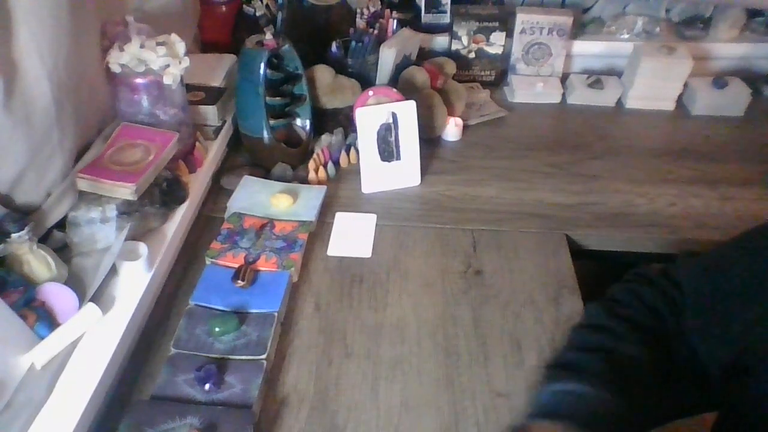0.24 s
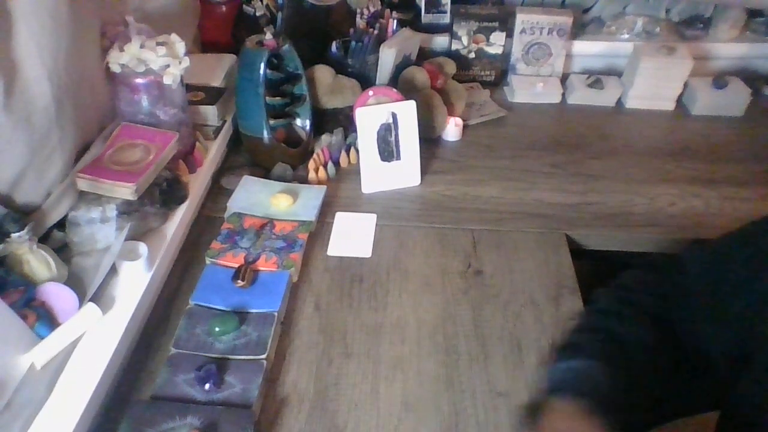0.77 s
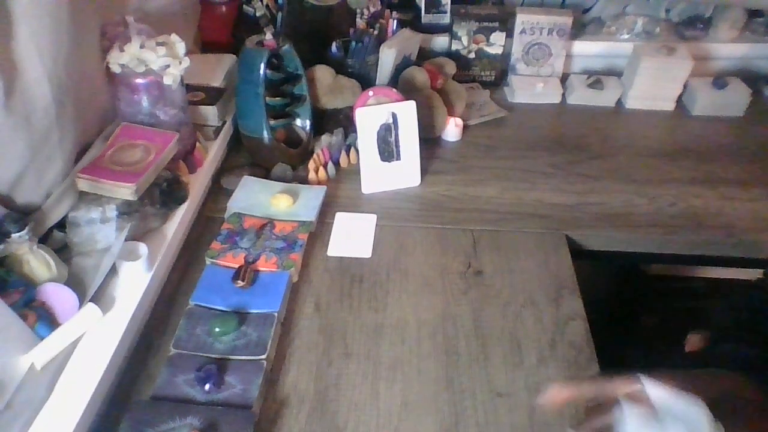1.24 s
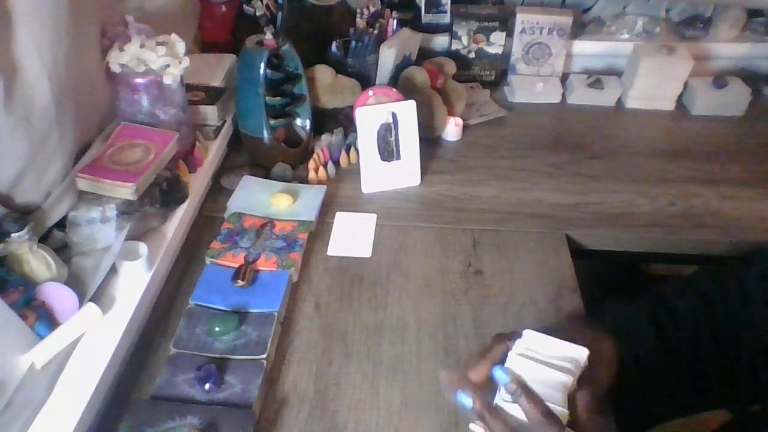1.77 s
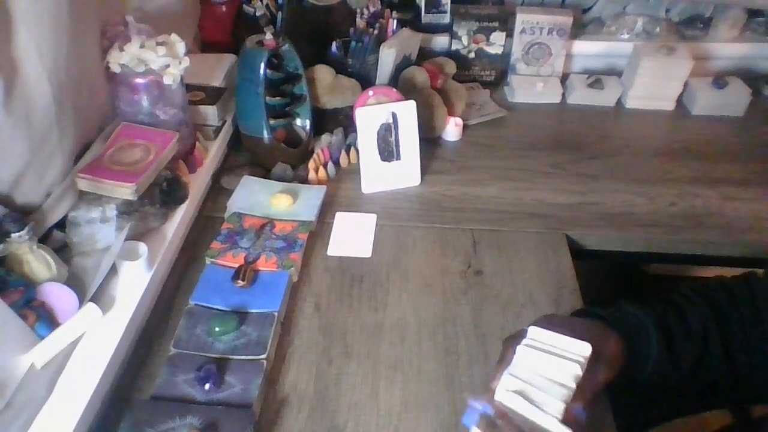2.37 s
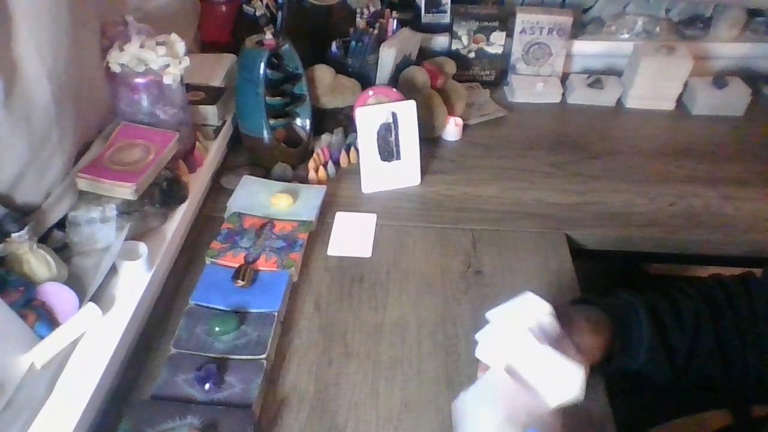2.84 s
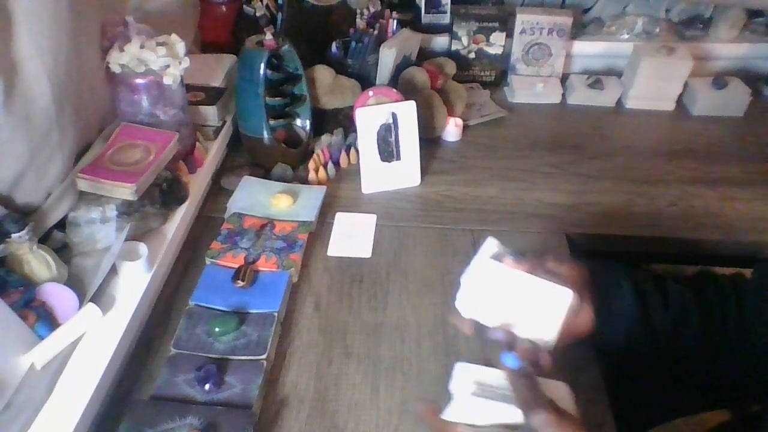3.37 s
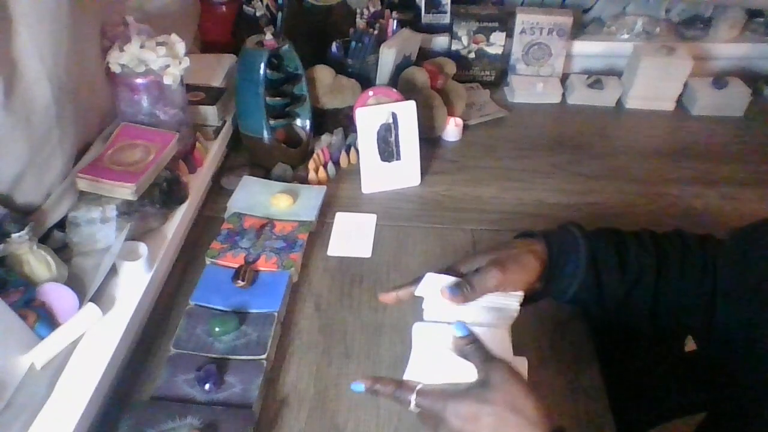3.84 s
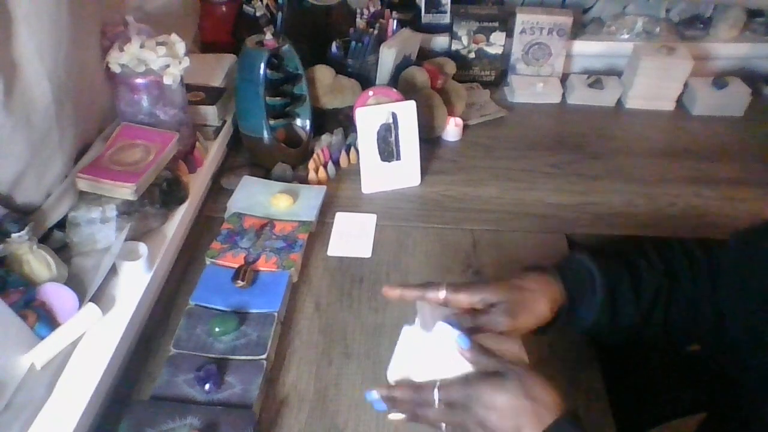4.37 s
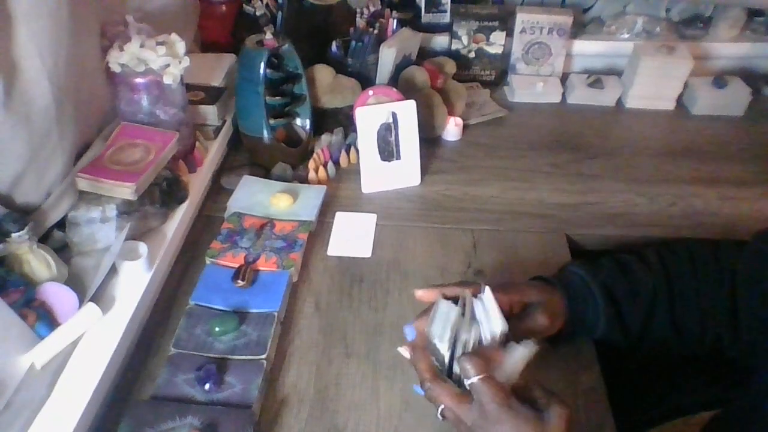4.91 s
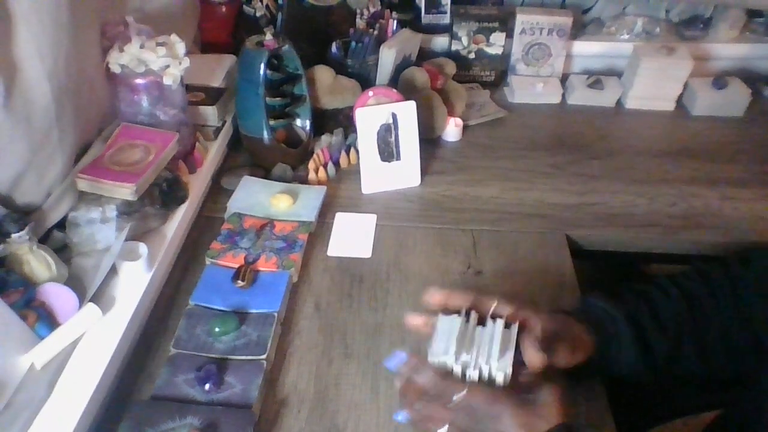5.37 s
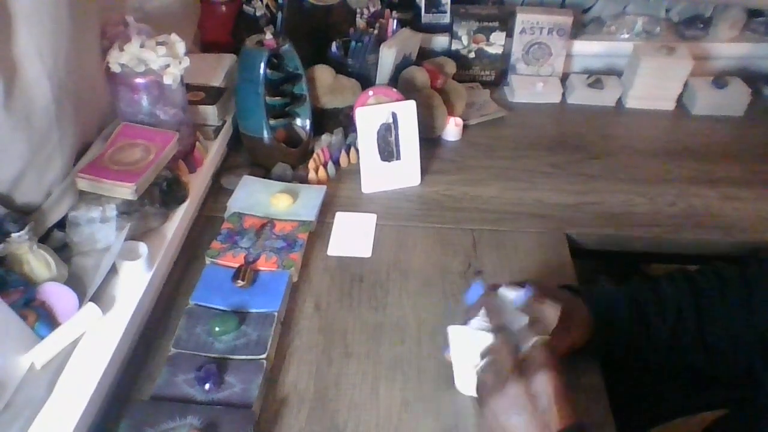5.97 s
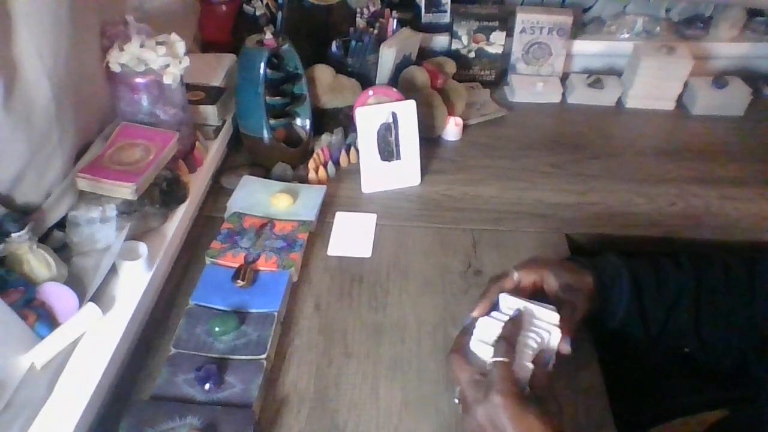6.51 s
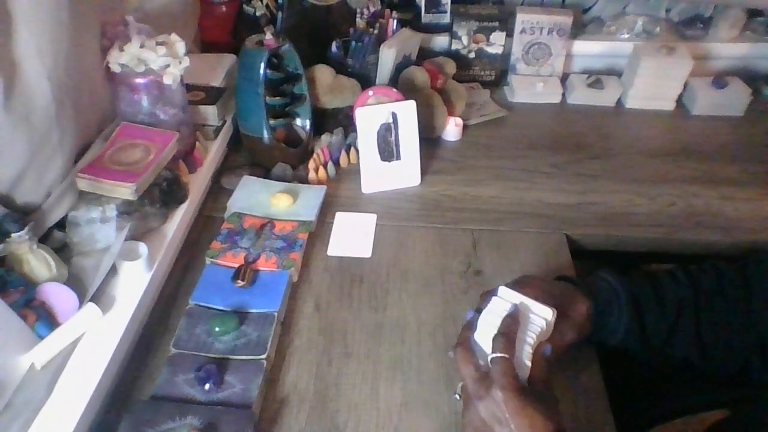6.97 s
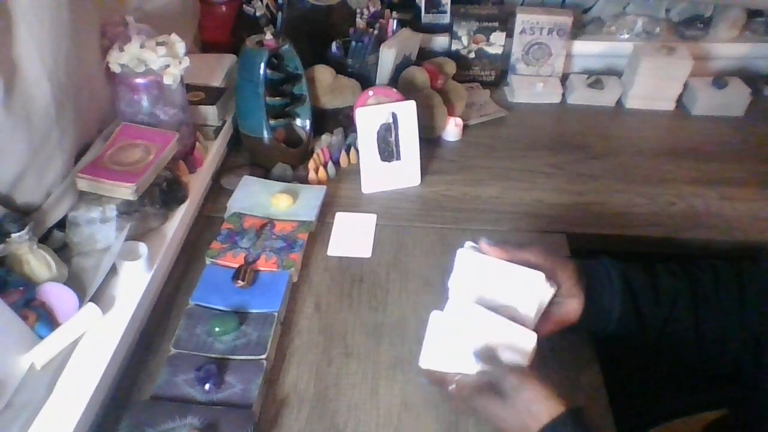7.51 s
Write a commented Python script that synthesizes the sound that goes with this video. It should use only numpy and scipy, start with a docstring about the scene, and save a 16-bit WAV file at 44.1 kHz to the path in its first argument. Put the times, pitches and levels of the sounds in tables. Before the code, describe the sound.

Near silence, then a hard double clack of cards, papery riffling and rubbing, firm taps on wood and short pauses in a small room.

```python
"""A deck of stiff cards is split, pushed together and knocked square on a wooden desk in a small room.
Knocks are impulses and noise rattles through resonant bodies; slides are stick-slip clicks over rubbing noise.
Brief wavering tones, rustles of ticks and rubbing, a faint thin hiss and slow pulses of the shoved desk join in.
A nearby computer microphone limits the loudest peaks and turns down the quiet with its noise suppressor."""
import sys
import numpy as np
from scipy import signal
from scipy.io import wavfile
from scipy.ndimage import uniform_filter1d

SR = 44100
rng = np.random.default_rng(int(sys.argv[2]) if len(sys.argv) > 2 else 0)


def pcm_store(signal):
    """Save signal as 16-bit PCM."""
    levels = np.round(np.clip(np.atleast_2d(signal), -1, 1) * 32767)
    wavfile.write(sys.argv[1], SR, levels.astype(np.int16).T)


N = 341334  # length in samples


def from_db(db):
    """Logarithmic level: decibels become amplitude gain."""
    return 10 ** (np.asarray(db) / 20)


def unit_rms(x):
    """Normalisation: the signal is scaled to a root mean square of 1."""
    return x / np.sqrt(np.mean(x ** 2) + 1e-20)


def read(points, hz):
    """Interpolation: a table of frequency and value is read on a log-frequency axis."""
    table_hz, value = np.transpose(points)
    return np.interp(np.log(hz + 1), np.log(table_hz + 1), value)


def add(mix, start_s, sound):
    """Superposition: a sound is summed into the mix from its start time."""
    part = mix[max(round(start_s * SR), 0):][:len(sound)]
    part += sound[:len(part)]


# registers of the sound, in order desk, packet, card edges, card faces: low_hz, high_hz
REGISTER_BANDS = [(90, 450), (450, 1200), (1200, 3000), (3000, 9000)]


def responses(colour, modes, size=8192):
    """Resonance: minimum-phase impulse responses of a body, one for each register."""
    hz = np.fft.rfftfreq(size, 1 / SR) + 1
    body_db = read(colour, hz)
    for mode_hz, width_hz, mode_db in modes:
        body_db = body_db + mode_db / (1 + (2 * (hz - mode_hz) / width_hz) ** 2)
    bodies = []
    for k, (low_hz, high_hz) in enumerate(REGISTER_BANDS):
        # the lowest register has no lower limit
        share = 1 / (1 + (hz / high_hz) ** 10) / (1 + (k > 0) * (low_hz / hz) ** 10)
        log_gain = np.log(from_db(body_db) * np.sqrt(share) + 1e-5)
        # the Hilbert transform of the log gain gives the phase of a causal body
        circle = np.r_[log_gain, log_gain[-2:0:-1]]
        spectrum = np.exp(np.conj(signal.hilbert(circle)))
        bodies.append(np.fft.ifft(spectrum).real[:size // 2])
    return bodies


ATTACK_S, RELEASE_T60_S = 0.0076, 0.11


def stroke(length_s, swell_db):
    """Amplitude envelope: linear attack, a swell or fade even in decibels, exponential release."""
    t = np.arange(0, length_s + 2 * RELEASE_T60_S, 1 / SR)
    attack = np.minimum(t / ATTACK_S, 1)
    hold_db = swell_db * (np.minimum(t / length_s, 1) - .5)
    release_db = -60 * np.maximum(t - length_s, 0) / RELEASE_T60_S
    return attack * from_db(hold_db + release_db)


DECK_IN_HAND_S = 1.7  # the deck is lifted; before this no loose edges flick


def flicks(per_s=58, spread_db=5.5, count=1500):
    """Random point process: card edges escape one by one as single clicks at uneven gaps."""
    gap_draw, size_draw = rng.random((count, 2)).T
    gaps_s = (.1 - .9 * np.log(1 - gap_draw)) / per_s
    at = (np.cumsum(gaps_s) * SR).astype(int)
    sizes = from_db(spread_db * (2 * size_draw - 1))
    train = np.zeros(N)
    train[at[at < N]] = sizes[at < N]
    return unit_rms(train) * (np.arange(N) > DECK_IN_HAND_S * SR)


# a hand pushes a packet over cards or desk; weight (desk register) and hiss (face register) are relative
# to the level: start_s, length_s, level_db, swell_db, weight_db, hiss_db
PACKET_SLIDES = [(0.0, 0.11, -50, -3, -3, -27), (0.205, 0.11, -63.5, -1.5, 10, 14),
                 (0.364, 0.066, -68.5, -15.5, -10.5, 22), (0.479, 0.14, -42.5, -6.5, -3.5, -8.5),
                 (0.602, 0.16, -50, 9, -34, -3.5), (0.763, 0.16, -47.5, 4, 6, 7.5),
                 (0.93, 0.13, -54.5, 4.5, 4.5, 8.5), (1.093, 0.085, -56.5, 8, -21, 6.5),
                 (1.483, 0.04, -76, 6.5, -8, 28), (2.409, 0.079, -45.5, -0.5, -2.5, -21),
                 (2.492, 0.052, -34.5, -19, -2.5, -18.5), (2.707, 0.21, -44, 10.5, 8.5, -14.5),
                 (2.865, 0.043, -32.5, 6, 6, -12), (2.932, 0.054, -30.5, 7, -12, -9),
                 (3.017, 0.033, -42, 19, -26.5, -19), (3.223, 0.04, -66.5, 1, -20, 16.5),
                 (3.703, 0.088, -41, -19.5, 2, -12), (3.775, 0.1, -31, 7.5, -9, -6.5),
                 (3.892, 0.079, -35.5, 9, -3.5, -9), (4.008, 0.14, -42, 3.5, -9.5, 1),
                 (4.184, 0.12, -45, 14.5, -6.5, 5), (4.264, 0.095, -31.5, -6, -8.5, -14),
                 (4.392, 0.069, -42, 4, -14, 1.5), (4.517, 0.054, -30.5, 5.5, -10.5, -9.5),
                 (4.584, 0.083, -52, 4.5, -16, 6), (4.659, 0.17, -32.5, 21, -2.5, -37.5),
                 (4.911, 0.089, -45, 18.5, 2, -15), (5.025, 0.11, -48.5, 1, -11, -34.5),
                 (5.137, 0.069, -33.5, 17, -3, -7), (5.199, 0.18, -29.5, 0.5, 0, -13),
                 (5.492, 0.037, -42.5, 18, -16.5, -29.5), (5.541, 0.13, -27.5, 0, -9, -19),
                 (5.682, 0.12, -29.0, -9, -0.5, -17.5), (5.811, 0.15, -28.0, -9, -5, -16),
                 (5.922, 0.067, -27.0, -5.5, -10.5, -8.5), (6.001, 0.12, -53, 8.5, -32, 4),
                 (6.143, 0.099, -57.5, -2, -22.5, 22.5), (6.279, 0.085, -37.5, -10, 6, -18),
                 (6.401, 0.177, -56.5, 19, 9, -14), (6.934, 0.032, -43, 4, 7, -19),
                 (7.207, 0.066, -31.5, 7.5, -5, -9.5), (7.402, 0.06, -30.5, -5.5, -12, -19),
                 (7.477, 0.032, -27, 2.5, -19, -15)]
EDGE_RUB_DB, EDGE_HISS_SHARE = -1.5, .48  # edges rub along and take this share of the hiss decibels


def pressure():
    """Power summation: overlapping strokes give the rubbing strength, samples x registers."""
    power = np.zeros((N, len(REGISTER_BANDS)))
    for start_s, length_s, level_db, swell_db, weight_db, hiss_db in PACKET_SLIDES:
        edge_db = EDGE_RUB_DB + EDGE_HISS_SHARE * hiss_db
        register_db = level_db + np.array([weight_db, 0, edge_db, hiss_db])
        add(power, start_s, np.outer(stroke(length_s, swell_db), from_db(register_db)) ** 2)
    return np.sqrt(power)


def shifting(x, patchy_db):
    """Time-varying spectrum: hands and packets move, so the colour of the rubbing drifts."""
    z = signal.stft(x, SR, nperseg=512, noverlap=384)[2]
    across_bins = uniform_filter1d(rng.standard_normal(z.shape), size=6, axis=0)
    patches = unit_rms(uniform_filter1d(across_bins, size=20, axis=1))  # over frames
    return signal.istft(z * from_db(patchy_db * patches), SR, nperseg=512, noverlap=384)[1][:N]


# friction in each register; smooth rubbing and flicks are relative to the slips, spread is per unit of
# random force, patchy is the drift of colour: slips_per_s, spread_db, smooth_db, flick_db, patchy_db
REGISTER_FRICTION = [(500, 0.99, -7, -19, 6.5), (532, 0.6, -3.5, -7, 8.1), (533, 1.5, -3, -13, 6.9),
                     (975, 1.4, 2.5, -1.5, 4.5)]
# resonances of the packet in cupped hands, above the broad colour: pitch_hz, width_hz, level_db
PACKET_MODES = [(160, 150, 9.5), (311.6, 30, 10.5), (464.7, 41, 10.5), (684.7, 21, 13), (824.5, 32, 10),
                (996, 17, 11), (1488, 70, 11), (1853, 120, 6.5), (2306, 53, 7), (3700, 90, -5.5)]
# broad colour of sliding: frequency_hz, level_db
SLIDING_COLOUR = [(30, -32), (55, -28), (80, -24.5), (140, 12.5), (400, 5.5), (750, 15.5), (1300, 1.5),
                  (2500, -15.5), (4000, -19), (5500, -18), (7200, -19.5), (9000, -40)]


def slides(grip_db=0.5, trim_db=.3, steady_s=.035):
    """Stick-slip friction: tiny clicks and flicks over smooth rubbing, as the grip varies."""
    out, edges = np.zeros(N), flicks()
    wander = uniform_filter1d(uniform_filter1d(rng.standard_normal(N), size=260), size=260)
    grip = from_db(grip_db * unit_rms(wander))
    chance, sign = rng.random(N), rng.choice([-1, 1], N)
    force = np.minimum(rng.exponential(1, N), 4)
    bodies = responses(SLIDING_COLOUR, PACKET_MODES)
    for body, strength, friction in zip(bodies, pressure().T, REGISTER_FRICTION):
        slips_per_s, spread_db, smooth_db, flick_db, patchy_db = friction
        slips = unit_rms((chance < slips_per_s / SR) * sign * from_db(spread_db * force))
        smooth = from_db(smooth_db) * rng.standard_normal(N)
        drive = (slips + smooth + from_db(flick_db) * edges) * grip
        rub = shifting(signal.oaconvolve(drive, body)[:N], patchy_db)
        # the stroke sets the mean strength; only the fine grain is left to chance
        mean_power = uniform_filter1d(rub ** 2, int(steady_s * SR))
        rub /= np.sqrt(abs(mean_power) + 1e-12)
        out += rub * strength * from_db(trim_db)
    return out


# a packet strikes cards or desk; thump, clack of edges and snap of faces are relative to the knock,
# t60 is before the stretch of each register: start_s, knock_db, thump_db, clack_db, snap_db, rattle_t60_s
PACKET_KNOCKS = [(0.2188, -49, 3.5, 3.5, 9.5, 0.04), (0.493, -30.5, -1.5, -12, -20, 0.034),
                 (0.505, -49.5, 12.5, 9, 18, 0.03), (1.451, -58, -3, 6.5, 25.5, 0.031),
                 (1.775, -12, -6.5, -8.5, -16.5, 0.029), (1.7841, -9, -11, -4, -13.5, 0.079),
                 (1.8033, -20.5, -11.5, -2.5, -1.5, 0.12), (1.8236, -25, -5, 7, -7.5, 0.12),
                 (1.8326, -41.5, 4, -13, -2, 0.025), (1.9849, -29, -12, 5, -16, 0.097),
                 (2.0409, -28.5, -11.5, 5, -1.5, 0.096), (2.0613, -33, -10, 6, -0.5, 0.073),
                 (2.134, -30.5, -14.5, -13, -28, 0.12), (2.1556, -34.5, -15, 10, -9, 0.065),
                 (2.1791, -31.5, -22.0, -4, -16.5, 0.083), (2.4846, -27.5, -8.5, 0.5, -19, 0.063),
                 (2.5178, -30, -1, -1.5, -17, 0.067), (2.9023, -36.5, -12, 4, -16, 0.033),
                 (2.9364, -40.5, 7, -21, 6, 0.079), (2.9602, -30, -12.5, -21, -3.5, 0.055),
                 (3.0015, -21.5, -26, -5.5, -15.5, 0.06), (3.716, -45.5, 5, 9, 6.5, 0.015),
                 (3.8147, -38, 8, 1.5, -9, 0.12), (3.8464, -23.5, -2, -7.5, 4.5, 0.031),
                 (3.8745, -42.5, 13, 7.5, 19.5, 0.015), (3.9452, -35.5, -21, 8, 9.5, 0.034),
                 (3.9958, -43, -20, 4.5, 16, 0.055), (4.3348, -42, -34, 8, 7.5, 0.032),
                 (4.397, -32, -5, -13.5, -27, 0.015), (4.4215, -47.5, -5, 12, 18.5, 0.071),
                 (4.4533, -37.5, 10, -12, -16.5, 0.12), (4.6707, -13, -10, -9, -7, 0.093),
                 (4.6761, -23, -3.5, 9.5, 0.5, 0.12), (4.713, -10, -14, -7.5, -17.5, 0.15),
                 (4.7201, -10.5, -10.5, -4.5, -18.0, 0.12), (4.806, -25, -12, 6, -12.5, 0.105),
                 (4.8341, -32.5, -8, 9, -1, 0.051), (4.884, -29, -6.5, 3, -31.5, 0.056),
                 (4.966, -30.5, -32, -8.5, -18, 0.036), (4.9776, -31.5, -37, 5, -4, 0.091),
                 (5.2221, -18.5, -9.5, 4, 0.5, 0.084), (5.359, -16, -5.5, -2.5, -15.5, 0.12),
                 (5.4344, -23, -13.5, -2.5, -36.5, 0.119), (5.4825, -28.5, -38, 11, -4, 0.072),
                 (5.5219, -25.5, -24, 13, 9, 0.055), (5.5793, -21.5, -1, -2.5, -9.5, 0.12),
                 (5.8093, -31.5, -7, -1, -7, 0.028), (6.1572, -44, -7, 14, 13.5, 0.12),
                 (6.2244, -26, -28, -5, -6, 0.039), (6.2642, -18, 2.5, 7.5, -6, 0.11),
                 (6.276, -25, -1, -6, -15, 0.036), (6.2899, -19, -6, 8.5, -2, 0.069),
                 (6.3863, -38.5, 4, 0.5, -17.0, 0.033), (6.421, -33.5, 1, -1, -25, 0.106),
                 (6.4491, -26.5, -20, -3.5, -40, 0.12), (6.5051, -34, -3.5, 3.5, -32, 0.116),
                 (6.942, -23.5, -15, -14.5, -38, 0.067), (7.2364, -29.5, -7, -1.5, -18, 0.032),
                 (7.4213, -22.5, -20.5, -5, -24.5, 0.081), (7.5126, -30, -13.5, -1, -4.5, 0.052)]
# resonances of desk and deck, above the broad colour: pitch_hz, width_hz, level_db
DESK_MODES = [(145, 35, 6.5), (332.7, 35, 7), (510, 130, 3.5), (890, 70, -0.5), (960, 60, -5),
              (1590, 120, -0.5), (1690, 76, 8), (2280, 200, 4), (2460, 65, 9), (2710, 60, 2.5),
              (3115, 150, 0), (3710, 65, 4)]
# broad colour of knocks: frequency_hz, level_db
IMPACT_COLOUR = [(30, -25), (80, -8.5), (140, 4), (400, -4.5), (900, 15.5), (1500, -1), (1950, 2),
                 (2500, -4.5), (4000, -10), (5500, -11), (7200, -19.5), (9000, -37.5)]


def knocks(rattle_db=(3.5, 3.5, 2.5, 0.7), stretch=(1.1, 1.05, .95, .85), rise_s=0.0004, size=8192):
    """Impact excitation: one sharp blow, then a decaying rattle of loose cards, rings the bodies."""
    out, t = np.zeros(N), np.arange(size) / SR
    bodies = responses(IMPACT_COLOUR, DESK_MODES)
    onset = t < .008  # levels hold for the first 8 ms
    for start_s, knock_db, thump_db, clack_db, snap_db, t60_s in PACKET_KNOCKS:
        levels_db = knock_db + np.array([thump_db, 0, clack_db, snap_db])
        contacts = rng.standard_normal(size) * (1 - np.exp(-t / rise_s))
        for body, level_db, loose_db, longer in zip(bodies, levels_db, rattle_db, stretch):
            rattle = contacts * from_db(-60 * t / max(t60_s * longer, .008))
            force = from_db(loose_db) * rattle / np.linalg.norm(rattle[onset])
            force[0] += 1  # the blow itself
            ring = signal.fftconvolve(force, body)[:size]
            add(out, start_s, from_db(level_db) * ring / np.sqrt(np.mean(ring[onset] ** 2)))
    return out


# brief wavering tones: dragged packets, the ring of a knock, a faint whistling tail; sigma is the Gaussian
# half length, level the rms at the peak: peak_s, sigma_s, pitch_hz, level_db
BRIEF_TONES = [(0.499, 0.0025, 753, -20.5), (0.514, 0.0076, 741, -29), (1.043, 0.028, 118.2, -42.5),
               (1.164, 0.022, 1380, -37.5), (1.251, 0.067, 1220, -49.5), (1.786, 0.0081, 1464, -10),
               (2.886, 0.017, 450, -32.5), (3.008, 0.013, 816, -20.5), (3.721, 0.0048, 690, -20),
               (4.3, 0.0087, 705, -18.5), (4.558, 0.026, 682, -26.5), (5.459, 0.04, 1015, -26.5),
               (5.734, 0.016, 304.4, -26), (6.121, 0.018, 676, -34.5), (6.603, 0.021, 145, -24.5),
               (7.265, 0.017, 664, -22), (7.278, 0.029, 349, -36.5), (7.371, 0.0093, 650, -35.5),
               (7.425, 0.0044, 693.5, -19), (7.505, 0.016, 500, -33.5)]


def wavering_tones(waver=0.039, waver_s=0.0035):
    """Frequency modulation: sines waver at random about one pitch each, swelling and dying."""
    out, t = np.zeros(N), np.arange(-.12, .12, 1 / SR)
    for peak_s, sigma_s, pitch_hz, level_db in BRIEF_TONES:
        drift = unit_rms(uniform_filter1d(rng.standard_normal(len(t)), int(waver_s * SR)))
        turns = np.cumsum(pitch_hz * (1 + waver * drift)) / SR
        tone = unit_rms(np.sin(2 * np.pi * turns))
        add(out, peak_s + t[0], from_db(level_db) * np.exp(-.5 * (t / sigma_s) ** 2) * tone)
    return out


# rustles of loose cards; before the deck is in hand only light rubbing: start_s, length_s, level_db, swell_db
CARD_RUSTLES = [(1.122, 0.19, -42, -23), (1.791, 0.035, -18.5, 0), (1.859, 0.26, -40, 0.5),
                (2.131, 0.16, -43, -4.5), (2.502, 0.22, -43, -17), (3.237, 0.062, -53, 7),
                (3.815, 0.35, -41.5, -2.5), (4.728, 0.18, -33.0, -19), (5.198, 0.43, -37.0, 0.5),
                (5.636, 0.32, -38.5, -4), (6.311, 0.241, -44.5, 11), (6.611, 0.16, -46.5, -10)]
# share of each register in the rustle: level_db
RUSTLE_REGISTERS = (-10, -5, -1.5, -10.5)


def rustles(scuff_db=1.0, rub_db=-1, scuff_t60_s=.026):
    """Granular excitation: light rubbing, joined by scuffing ticks once the deck is in hand."""
    strength, ticks = np.zeros(N), flicks(per_s=125, spread_db=6)
    for start_s, length_s, level_db, swell_db in CARD_RUSTLES:
        add(strength, start_s, from_db(level_db) * stroke(length_s, swell_db))
    decay = from_db(-60 * np.arange(SR // 10) / SR / scuff_t60_s)
    grain, rub = rng.standard_normal((2, N))
    scuffs = unit_rms(signal.oaconvolve(ticks, decay)[:N] * grain)
    drive = unit_rms(ticks + from_db(scuff_db) * scuffs + from_db(rub_db) * rub)
    parts = responses(IMPACT_COLOUR, DESK_MODES)
    body = sum(from_db(db) * part / np.linalg.norm(part) for db, part in zip(RUSTLE_REGISTERS, parts))
    return signal.oaconvolve(drive * strength, body)[:N]


def thin_hiss(start_s=1.19, length_s=.36, level_db=-48.5, band_hz=(3400, 4900)):
    """Band-limited noise: a faint, steady, thin hiss around 4 kHz."""
    out, strength = np.zeros(N), stroke(length_s, 0)
    band = signal.butter(5, band_hz, "band", fs=SR, output="sos")
    hiss = unit_rms(signal.sosfilt(band, rng.standard_normal(len(strength))))
    add(out, start_s, from_db(level_db) * strength * hiss)
    return out


# blows that shove the whole desk; level is about the peak: start_s, level_db
DESK_SHOVES = [(1.7756, -25), (3.82, -28), (6.2624, -9)]


def shoves(push_s=0.00074):
    """Damped displacement: one slow push and rebound of the desk top under the microphone."""
    out, u = np.zeros(N), np.arange(SR // 8) / SR / push_s
    for start_s, level_db in DESK_SHOVES:
        add(out, start_s, from_db(level_db) * 2 * u * (2 - u) * np.exp(-u))
    return out


# decay of the room: frequency_hz, t60_s
ROOM_DECAY = [(150, 0.057), (500, 0.15), (1200, 0.48), (2500, 0.29), (4500, 0.27), (8000, 1)]
# soft furnishings return little of the top treble: frequency_hz, level_db
ROOM_RETURN = [(60, -14.5), (150, 1), (1200, -5), (2500, 4.5), (4500, -2.5), (8000, -13)]


def room(x, wet_db, gap_s=0.023):
    """Reverberation: after a gap, a diffuse noise tail decays at its own rate at each frequency."""
    noise = rng.standard_normal(SR) * (np.arange(SR) > gap_s * SR)
    hz, t, z = signal.stft(noise, SR, nperseg=256)
    decaying = z * from_db(-60 * t / read(ROOM_DECAY, hz)[:, None])
    # the wet level refers to the tail before it is coloured
    size = np.linalg.norm(signal.istft(decaying, SR, nperseg=256)[1])
    coloured = decaying * from_db(read(ROOM_RETURN, hz))[:, None]
    tail = signal.istft(coloured, SR, nperseg=256)[1] / size
    return x + from_db(wet_db) * signal.fftconvolve(x, tail)[:N]


def scene(lowest_hz=62):
    """Radiation: cards are too small to make deep bass, which only the shoved desk gives."""
    struck = room(knocks(), wet_db=-14)
    rubbed = room(slides() + rustles() + wavering_tones() + thin_hiss(), wet_db=-24)
    highpass = signal.butter(3, lowest_hz, "high", fs=SR, output="sos")
    cards = signal.sosfilt(highpass, struck + rubbed)
    return (cards + shoves())[None]


# the suppressor lets through what is louder, per spectral bin: frequency_hz, level_db
SUPPRESSOR_THRESHOLD = [(60, -64.5), (150, -53), (400, -60.5), (800, -55.5), (1300, -65.5), (2000, -62),
                        (3000, -64.5), (4300, -84), (6000, -64), (7300, -78), (8200, -96.5), (9000, -87.5)]


def suppress(x, depth_db=40, slope=3.9):
    """Downward expansion: each patch of the spectrum below the threshold is turned down."""
    hz, _, z = signal.stft(x, SR, nperseg=512, noverlap=384)
    power = uniform_filter1d(abs(z) ** 2, size=3, axis=-2)  # over bins
    power = uniform_filter1d(power, size=7, axis=-1)  # over frames
    level_db = 10 * np.log10(abs(power) + 1e-16)
    under_db = np.maximum(read(SUPPRESSOR_THRESHOLD, hz)[:, None] - level_db, 0)
    gain = from_db(-np.minimum(slope * under_db, depth_db))
    return signal.istft(z * gain, SR, nperseg=512, noverlap=384)[1][:, :N]


def record(dry, ceiling=.93, edge_hz=8950):
    """Transduction: noise suppression, soft limiting of peaks, then the microphone's band limit."""
    clean = suppress(dry)
    limited = clean / (1 + (clean / ceiling) ** 8) ** (1 / 8)
    lowpass = signal.firwin(161, edge_hz, window=("kaiser", 7), fs=SR)
    return signal.oaconvolve(limited, lowpass[None], "same")


dry = scene()
out = record(dry)
pcm_store(out)
```